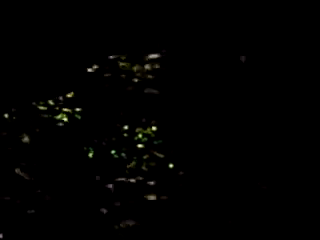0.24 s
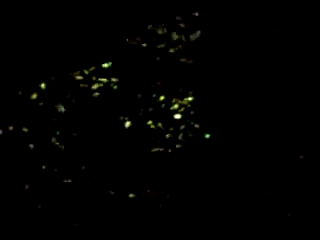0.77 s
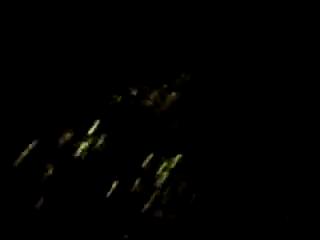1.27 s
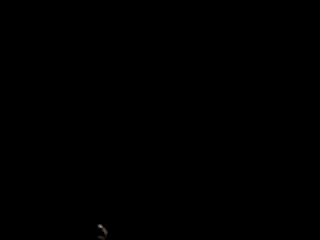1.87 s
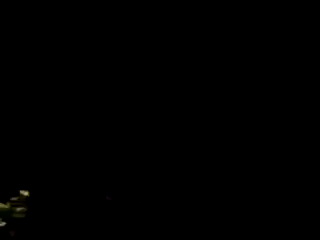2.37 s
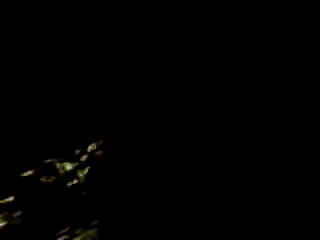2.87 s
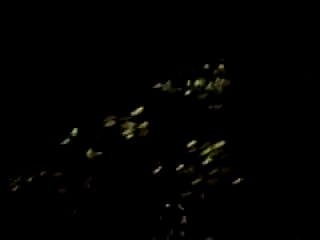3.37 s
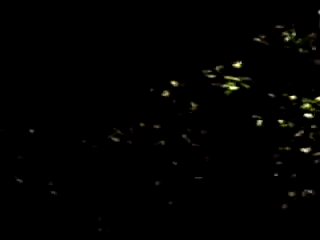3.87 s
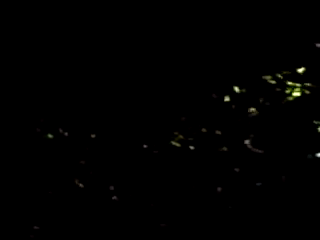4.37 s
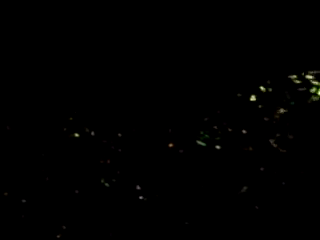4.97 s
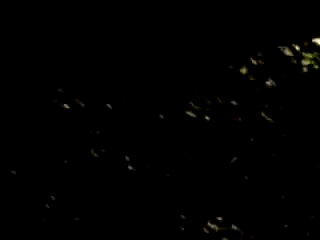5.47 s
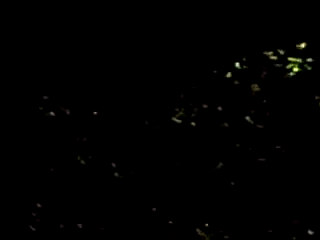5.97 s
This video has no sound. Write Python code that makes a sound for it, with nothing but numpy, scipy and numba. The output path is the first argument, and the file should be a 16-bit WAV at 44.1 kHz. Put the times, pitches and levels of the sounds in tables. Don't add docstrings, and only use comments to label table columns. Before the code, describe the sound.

A marsh at night, heard through a small recorder with soft hiss and a dulled top. Throughout, distant engines hum very low, around a hundred hertz, swelling and dipping with rough shaking, more strongly after 4.9 s. A band of toads trills steadily near 1.9 kHz, about thirty pulses a second, blurred together by distance. Far chorus frogs creak continually and overlap, each call about half a second of pulses around 3 kHz, rising and slowing, smeared by reed echoes; a few are lower. From 0.78 to 1.35 s one close frog dominates: fourteen dry, wet-edged clicks, weak at first, growing loud by 1.1 s, slowing and climbing in pitch, ending in a tight stutter at 1.31 s with a short ringing tail. Then only the distant chorus, toads and engines until 5.9 s, when a larger frog gives a soft, throaty cluck of several tiny falling notes, over by 6 s.

```python
import sys
import numpy as np
from scipy import signal
from scipy.fft import rfft, irfft
from scipy.io import wavfile
from scipy.ndimage import uniform_filter1d
from numba import njit

SR = 44100
rng = np.random.default_rng(int(sys.argv[2]) if len(sys.argv) > 2 else 0)


def invert_db(level):
    return 10 ** (np.asarray(level, dtype=float) / 20)


def dump(signal):
    limited = np.clip(np.atleast_2d(signal).T, -1, 1)
    pcm = np.round(limited * 32767).astype(np.int16)
    wavfile.write(sys.argv[1], SR, pcm)


N = 274743
ENGINE_CYCLE_HZ = 23.35


def level(x, db):
    return x * invert_db(db) / np.sqrt(np.mean(x ** 2))


@njit
def svf(x, hz, width):
    y, band, low = np.empty(len(x)), 0., 0.
    for i in range(len(x)):
        g, k = np.tan(np.pi * hz[i] / SR), width / hz[i]
        v = (band + g * (x[i] - low)) / (1 + g * (g + k))
        band, low, y[i] = 2 * v - band, low + 2 * g * v, k * v
    return y


def hum(hz, width_hz):
    centre = hz + np.zeros(N)
    once = svf(rng.standard_normal(N), centre, width_hz)
    return level(svf(once, centre, width_hz), 0)


def add(track, start_s, sound):
    i = int(round(start_s * SR))
    sound = sound[max(-i, 0):max(N - i, 0)]
    track[max(i, 0):max(i, 0) + len(sound)] += sound


def reeds(x, t60_s, first_echo_s, sparse):
    t = np.arange(int(t60_s * SR)) / SR
    taps = rng.standard_normal(len(t)) * np.abs(rng.standard_normal(len(t))) ** sparse
    taps = taps * invert_db(-60 * t / t60_s) * (t > first_echo_s)
    return signal.fftconvolve(x, taps / np.sqrt(np.sum(taps ** 2)))[:N]


def fading(rate):
    k = int(SR / rate)
    held = np.repeat(rng.standard_normal(N // k + 1), k)
    return 1.1 * uniform_filter1d(held, size=k)[:N]


def engines(t):
    # start_s, level_db
    load = [(0, -46.5), (.8, -46.5), (1.1, -42), (1.75, -41), (1.92, -47.5), (2.25, -40), (2.72, -37),
            (2.96, -48), (3.2, -41), (4.1, -38.5), (4.25, -40.5), (4.45, -41), (4.63, -46), (4.9, -31),
            (5.15, -44), (5.37, -33.5), (5.6, -41), (6.1, -35)]
    # order, start_level_db, slope_db_per_s, fading_depth_db
    orders_fading = [(2, -51.5, -0.6, 3.5), (3, -50.5, -0.6, 0.5), (5.15, -44, -0.85, 3)]
    # centre_s, length_s, level_db
    shakes = [
        (2.5, 0.19, -52),
        (3.395, .6, -45),
        (4.35, .35, -43),
        (5.197, 0.22, -42),
        (5.804, 1, -53),
    ]
    # centre_s, level_db
    puffs = [(.19, -58), (.33, -58), (.55, -60), (.9, -61), (1.3, -58), (1.75, -58), (2.32, -61),
             (2.57, -60), (2.87, -62), (3.15, -61), (3.9, -63)]

    def bump(centre_s, length_s):
        return np.exp(-((t - centre_s) / length_s) ** 2)

    whine = invert_db(-66.5) + sum(invert_db(db) * bump(s, 0.057) for s, db in puffs)
    out = whine * hum(617.2, 22.6)
    out = out + invert_db(-74) * hum(173.0, 25) + invert_db(-50.5) * hum(28, 11) + invert_db(-46.0) * hum(77.0, 8.9)
    gains = {}
    for order, db, slope, depth_db in orders_fading:
        gains[order] = invert_db(db + slope * t + depth_db * fading(6))
    gains[2] = gains[2] + sum(invert_db(db) * bump(s, length / 2) for s, length, db in shakes)
    load_db = np.interp(t, *np.transpose(load))
    gains[4] = invert_db(load_db)
    highest = max(gains)
    gains[highest] = gains[highest] * invert_db(0.51 * (-43 - load_db))
    for order, gain in gains.items():
        hz = order * ENGINE_CYCLE_HZ
        tone = np.sin(2 * np.pi * hz * t + order)
        out = out + gain * (1.35 * tone + 0.51 * hum(hz, 24.5))
    return out


def air():
    # pitch_hz, level_db (per Hz)
    spectrum = [(20, -12), (100, -9.5), (160, -8.5), (383, -19), (617, -23.5), (945, -33), (1500, -36),
                (1940, -33.5), (2350, -35.5), (2720, -39.5), (3380, -32), (3970, -42), (10600, -43),
                (11300, -44)]
    hz, db = np.transpose(spectrum)
    f = np.arange(N // 2 + 1) * SR / N + 1
    colour = invert_db(np.interp(np.log(f), np.log(hz), db))
    low_cut = np.clip(f / 140, 0, 1) ** 0.9
    return level(irfft(rfft(rng.standard_normal(N)) * colour * low_cut, N), -45)


def toads(t):
    # pitch_hz, trill_per_s, level_db
    singers = [
        (1950, 31.5, 0),
        (1895, 30.5, -2),
        (1990, 33., -6),
        (1840, 29., -7),
        (1760, 27., -11),
    ]
    # start_s, level_db
    band_swell = [(0.0, -57), (0.61, -56.5), (1.16, -56), (1.66, -54.5), (1.96, -53.5), (2.34, -56.5),
                  (2.55, -54.5), (3.07, -55), (4.08, -54.5), (4.49, -56), (4.8, -52.5), (5.14, -57),
                  (5.5, -54), (6.23, -59)]
    out = 0
    for hz, rate, db in singers:
        held = np.repeat(rng.standard_normal(N // 4096 + 1), 4096)[:N]
        wander = uniform_filter1d(held, size=4096)
        throb_phase = 2 * np.pi * np.cumsum(rate * (1 + 0.041 * wander)) / SR
        throb = np.maximum(np.sin(throb_phase) + 0.1, 0)
        note = np.sin(2 * np.pi * np.cumsum(hz + 13 * wander) / SR)
        out = out + invert_db(db + 1.8 * wander) * throb * note
    out = level(out + reeds(out, .45, 0.0012, 0.76), 0)
    return out * invert_db(np.interp(t, *np.transpose(band_swell)))


def chorus():
    # start_s, length_s, first_pitch_hz, level_db
    calls = [(-.1, 0.44, 3370, -60.5), (-.1, 0.56, 2966, -57.5), (0.254, 0.62, 3190, -62),
             (0.804, 0.59, 3080, -59), (1.298, 0.47, 3250, -60), (1.505, 0.71, 2310, -66),
             (1.602, 0.51, 2960, -58), (1.697, 0.4, 3410, -65.5), (2.05, 0.45, 3310, -67),
             (2.195, 0.78, 2180, -61.5), (2.299, 0.58, 3020, -60.5), (2.648, 0.42, 3180, -67),
             (2.902, 0.47, 3185, -60), (3.199, 0.62, 2290, -65), (3.247, 0.47, 2950, -59.5),
             (3.349, 0.45, 3400, -63), (3.651, 0.46, 3230, -61), (3.954, 0.63, 3034, -61.5),
             (4.2, 0.39, 3140, -69), (4.492, 0.69, 2890, -60), (4.551, 0.54, 3204, -56.5),
             (4.95, 0.47, 3440, -66), (5.15, 0.55, 3120, -60), (5.448, 0.41, 3340, -66),
             (5.753, 0.61, 3080, -59)]
    out, t = np.zeros(N), np.arange(SR // 40) / SR
    for start_s, length_s, first_hz, db in calls:
        for share, j in zip(np.linspace(0, 1, 14), rng.standard_normal(14)):
            hz = first_hz * (1 + 0.085 * share ** 1.7) + 25 * j
            ping = t / .0013 * np.exp(-t / 0.0014) * np.sin(2 * np.pi * hz * t)
            pulse_s = start_s + length_s * (.7 * share + .3 * share ** 2)
            swell_db = -4.7 * (1 - min(share * 1.56, 1))
            add(out, pulse_s, invert_db(db + 21.5 + swell_db + 1.5 * j) * ping)
    return invert_db(-7.0) * out + reeds(out, 0.77, 0.0014, 0.17)


def pulse(sac_hz, effort, length_ms, chance):
    # pitch_hz, t60_s, level_db
    throat_rings = [(1653, 0.035, -11.5), (2230, 0.0038, -2), (2800, .004, -9), (3130, 0.0026, 1),
                    (4750, 0.0043, -6), (5620, 0.0065, -3.5), (5900, .005, -10), (7900, 0.005, -19)]
    t, out = np.arange(SR // 50) / SR, 0
    cycles = np.clip(np.round(4 - 6 * effort), 2, 4)
    sac = (sac_hz, .042 - 0.013 * effort, -11 + 9 * min(1.6 * effort, 1))
    starts = np.cumsum(cycles / sac_hz * (1 + .022 * chance[0])) - cycles / sac_hz
    rings = []
    for (hz, t60, db), c in zip(throat_rings, chance[1, ::-1]):
        rings.append((hz * (1 + .012 * c), t60 * (1 - .5 * (1 - effort)), db))
    for start, scatter_db in zip(starts[starts < length_ms / 1000], chance[1]):
        age = np.maximum(t - start, 0)
        for hz, t60, db in rings + [sac]:
            soften_db = -(2100 + 0.17 * hz) * start
            decay = invert_db(db + soften_db + scatter_db - 60 * age / t60)
            out = out - decay * np.sin(2 * np.pi * hz * age)
    closing_ms = 7.6 - 2.8 * effort
    out = out * (.2 + .8 * np.exp(-(t * 1000 / closing_ms) ** 4))
    skin = signal.butter(2, 5000 + 1200 * effort, fs=SR, output="sos")
    out = signal.sosfilt(skin, out)
    return out / np.abs(out).max()


def swell(hz, fall_ms):
    ms = np.arange(SR // 40) / SR * 1000 - 4
    rise_ms = .7 + .3 * fall_ms
    shape = np.exp(-np.where(ms < 0, ms / rise_ms, ms / fall_ms) ** 2)
    return shape * np.sin(2 * np.pi * hz * ms / 1000)


def near_frog():
    # start_s, peak_db, sac_hz, after_ring_db, after_ring_fall_ms
    creak = [(0.7818, -31.0, 3380, -9.2, 3.3), (0.8062, -29.4, 3400, -10.2, 1.2),
             (0.8357, -26.8, 3360, -8.5, 3.2), (0.8668, -27.2, 3420, -10.2, 3.3),
             (0.8975, -23.2, 3380, -9.7, 2.6), (0.9319, -18.7, 3440, -7.7, 1.9),
             (0.9699, -17.4, 3460, -7.1, 2.0), (1.0103, -15.2, 3490, -6.4, 2.7),
             (1.056, -13.3, 3540, -7.0, 3.9), (1.104, -12.6, 3590, -7.3, 3.5),
             (1.1564, -13.1, 3650, -7.6, 2.8), (1.2078, -13.2, 3700, -9.4, 5.7),
             (1.2557, -13.7, 3750, -9.0, 2.5), (1.3048, -16.9, 3740, -2.7, 4.5)]
    # start_s, peak_db, sac_hz, length_ms
    stutter = [
        (1.3099, -19, 3650, .5),
        (1.3124, -15.5, 3500, 1.0),
        (1.316, -17.5, 3520, 2.5),
        (1.319, -24, 3890, 2.6),
    ]
    # peak_s, peak_db, pitch_hz, fall_ms
    swells = [
        (1.3275, -27, 3760, 2.2),
        (1.3325, -31, 3780, 2.5),
        (1.2835, -33, 3750, 2),
        (1.272, -33, 3720, 2),
        (1.235, -36, 3700, 3),
        (1.345, -38, 3750, 4),
        (.9515, -40, 3450, 2.5),
    ]
    out = np.zeros(N)
    chance = rng.standard_normal((len(creak) + len(stutter), 2, 12))
    for (s, db, hz, after_db, fall_ms), c in zip(creak, chance):
        effort = np.clip((db + 31) / 17, 0, 1)
        length_ms = 1.2 + 2.0 * effort ** 1.5
        add(out, s, invert_db(db + 9.5 - 5.2 * effort) * pulse(hz, effort, length_ms, c))
        rebound_ms = 9.7 + 2.1 * effort
        add(out, s + (rebound_ms - 4) / 1000, invert_db(db + after_db - 0.8) * swell(hz, fall_ms))
    for (s, db, hz, length_ms), c in zip(stutter, chance[len(creak):]):
        add(out, s, invert_db(db) * pulse(hz, 1.0, length_ms, c))
    for s, db, hz, fall_ms in swells:
        add(out, s - 4 / 1000, invert_db(db) * swell(hz, fall_ms))
    dull = signal.sosfilt(signal.butter(4, 4300, fs=SR, output="sos"), out)
    out = out + invert_db(-14.5) * reeds(dull, 0.11, 0.0028, 1.1)
    return signal.sosfilt(signal.cheby2(6, 35, 1300, "high", fs=SR, output="sos"), out)


def cluck():
    # start_s, length_s, first_pitch_hz, level_db, brightness_db
    notes_sung = [
        (5.9, 0.025, 405, -32, -12),
        (5.92, 0.012, 345, -45, 2),
        (5.93, 0.026, 383, -37.5, -5.5),
        (5.948, 0.014, 427, -36, -7),
        (5.981, 0.018, 430, -44.5, -12),
    ]
    # pitch_hz, width_hz, level_db
    mouth = [(740, 300, -0.5), (1390, 260, 0.5), (1890, 290, 0.5), (2250, 180, -23)]
    out = np.zeros(N)
    flutter = 10 * uniform_filter1d(rng.standard_normal((len(notes_sung), 8, 2048)), size=200)
    for (s, length_s, first_hz, db, bright_db), f_db in zip(notes_sung, flutter):
        share = np.linspace(0, 1, min(int(length_s * SR), 2048))
        sag_hz = 2530 * length_s * share
        hz = (first_hz - sag_hz) * (1 + 0.015 * f_db[0, :len(share)])
        phase = 2 * np.pi * np.cumsum(hz) / SR
        note = 0
        for k in range(2, 8):
            gain = sum(invert_db(g) / (1 + (2 * (k * hz - f) / w) ** 2) for f, w, g in mouth)
            upper_db = (k > 2) * (bright_db + 3 - 8 * share + 4.1 * f_db[k, :len(share)])
            note = note + gain * invert_db(upper_db) * np.sin(k * phase + k * k)
        add(out, s, invert_db(db + 2.5) * np.sin(np.pi * share) ** 0.81 * note)
    return out + invert_db(-11) * reeds(out, 0.092, 0.0015, 2.2)


def scene():
    t = np.arange(N) / SR
    return (engines(t) + air() + toads(t) + chorus() + near_frog() + cluck())[None]


def band_limit(x):
    return signal.sosfilt(signal.butter(12, 12160, fs=SR, output="sos"), x)


def record(dry):
    dull = signal.sosfilt(signal.ellip(10, .2, 60, 11000, fs=SR, output="sos"), dry)
    return band_limit(dull)


dry = scene()
out = record(dry)
dump(out)
```